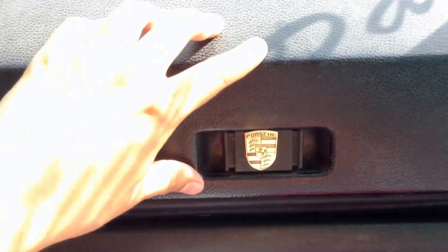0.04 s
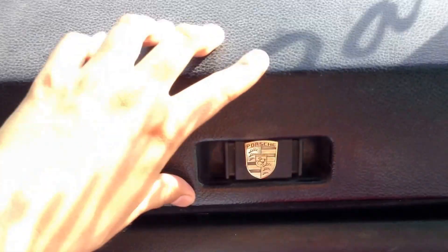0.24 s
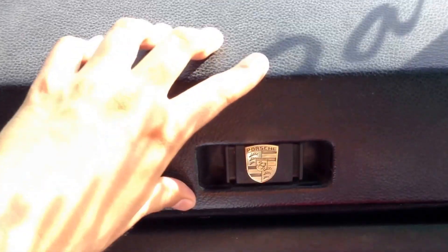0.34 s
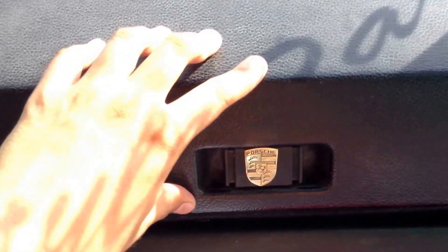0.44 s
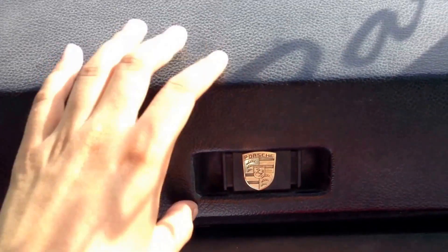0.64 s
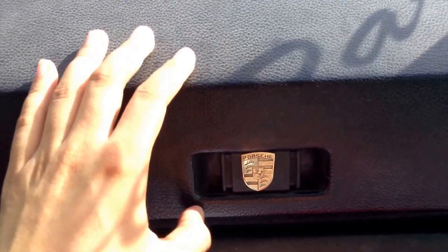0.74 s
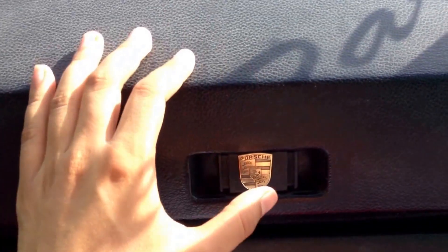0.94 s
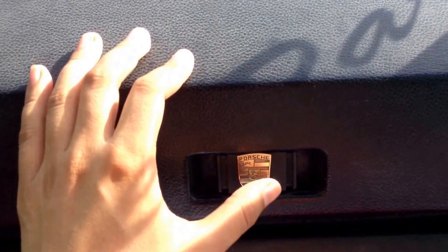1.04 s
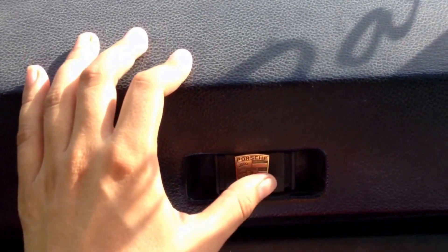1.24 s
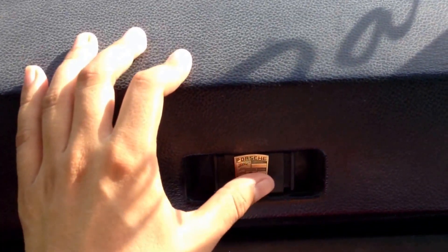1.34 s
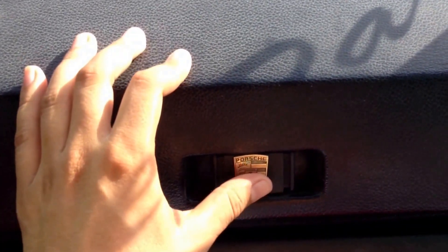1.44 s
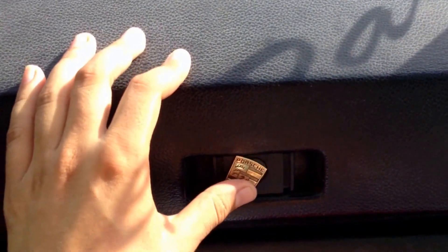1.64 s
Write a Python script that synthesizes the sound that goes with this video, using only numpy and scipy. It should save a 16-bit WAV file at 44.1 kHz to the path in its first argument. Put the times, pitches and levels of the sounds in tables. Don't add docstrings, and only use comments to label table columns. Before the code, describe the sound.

A glove box is pushed shut almost at once, a hollow low thump with a latch click and short plastic rattle, then soft finger bumps and palm rubbing, close microphone in a quiet parked car.

```python
import sys
import numpy as np
from scipy import signal
from scipy.fft import rfft, irfft
from scipy.io import wavfile

SR = 44100
rng = np.random.default_rng(int(sys.argv[2]) if len(sys.argv) > 2 else 0)


def unload_wav(signal):
    wavfile.write(
        sys.argv[1],
        SR,
        np.round(np.clip(np.atleast_2d(signal).T, -1, 1) * 32767).astype(np.int16),
    )


def amplitude_ratio(level_db):
    exponent = np.asarray(level_db, float) / 20
    return 10 ** exponent


N = 74970

# start_s, boom_db, boom_pitch_hz, boom_length_s, rattle_db
CONTACTS = [
    (0.18, -28.5, 280, 0.014, -49),
    (0.197, -24.5, 240, 0.021, -48.5),
    (0.205, -22.5, 297, .010, -50),
    (0.2115, -9.5, 292, .0200, -28),
    (0.2299, -17.5, 234, .013, -44),
    (0.251, -26, 220.7, 0.012, -59.5),
    (.198, -27, 165, .022, -65),
]
# start_s, boom_db, boom_pitch_hz, boom_length_s, rattle_db
BUMPS = [(.000, -52, 285, 0.006, -79), (0.074, -46, 273, 0.012, -71.5), (0.111, -53.5, 235.3, 0.017, -81),
         (0.131, -45, 261, .014, -71), (0.146, -47, 250, 0.013, -67), (0.341, -48.5, 200, 0.013, -64.5),
         (.344, -49.5, 257.3, 0.018, -79), (.398, -58, 247, 0.0092, -59.5), (0.401, -43.5, 240, .014, -85),
         (.427, -47, 264, .011, -64), (.472, -44, 256, 0.013, -66), (0.522, -45.5, 240, 0.0095, -67),
         (.532, -45, 267, 0.012, -67), (.575, -48.5, 248, 0.0095, -80), (.636, -61, 260, 0.014, -67.5),
         (0.656, -52, 287, .010, -67), (.663, -46.5, 267, 0.017, -76), (0.68, -52.5, 248, 0.0094, -77),
         (0.946, -56, 305.4, 0.011, -66.5), (0.953, -52, 290, 0.025, -72)]


def rms_one(x):
    return x / np.sqrt(np.mean(x ** 2) + 1e-20)


def at_hz(points, hz):
    table_hz, values = np.transpose(points)
    return np.interp(np.log(hz), np.log(table_hz), values)


def drift(rate_hz):
    pole = np.exp(-2 * np.pi * rate_hz / SR)
    wander = signal.lfilter([1], [1, -2 * pole, pole * pole], rng.standard_normal(N + SR))
    return rms_one(wander[SR:])


def ring(clicks, hz, t60_s):
    decay = amplitude_ratio(-60 / (t60_s * SR))
    turn = 2 * np.pi * hz / SR
    return signal.lfilter([0, np.sin(turn)], [1, -2 * decay * np.cos(turn), decay * decay], clicks + 1e-18)


def after(t, rise_s, t60_s):
    t = np.maximum(t, 0)
    return (1 - np.exp(-t / rise_s)) * amplitude_ratio(-60 * t / t60_s)


def booms():
    t, out = np.arange(N) / SR, 0
    for start_s, db, hz, length_s, _ in CONTACTS + BUMPS:
        phase = np.interp((t - start_s) / length_s, [0, 0.33, 1], [0, 0.5, 1])
        swell = np.sin(np.pi * phase) ** 0.55
        out = out + amplitude_ratio(db) * swell * np.sin(2 * np.pi * hz * (t - start_s))
    return out


def pressure(rows):
    t, hold_share, out = np.arange(N) / SR, 0.9, 0
    for start_s, _, _, length_s, db in rows:
        progress = (t - start_s) / (hold_share * length_s)
        out = out + amplitude_ratio(db) * np.interp(progress, [0, 0.15, 0.6, 1], [0.0022, 1, 0.6, 0.00011])
    return out


def rattle(rows):
    clicks_per_s, spread_db, rattle_db = 4000, 4, -12.5
    # pitch_hz, level_db, t60_s
    lid_modes = [(426.8, -1, 0.069), (463, -7, 0.1), (547, -10.5, .06), (625.3, -5, 0.11), (680, -9.5, .06),
                 (741, -13, 0.087), (835, -10, 0.15), (933, -4, .07), (1073, -6, 0.05), (1357, -12, 0.088),
                 (1526, -10, 0.1), (1767, -21, .05), (2100, -12.5, 0.027), (2745, -27, 0.042)]
    clicks = pressure(rows) * (rng.random(N) < clicks_per_s / SR)
    out = 0
    for hz, db, t60_s in lid_modes:
        sign = rng.choice([-1, 1], N)
        uneven = amplitude_ratio(db + rattle_db + spread_db * rng.standard_normal(N))
        out = out + ring(clicks * sign * uneven, hz, t60_s)
    return out


def crack(rows):
    crack_db, rise_s = -7, 0.0015
    # pitch_hz, density_db_per_hz
    colour = [(400, -13.5), (1200, -8), (2500, -18), (3300, -24), (4800, -22.5), (6700, -30.5), (9400, -56),
              (13300, -30)]
    # pitch_hz, t60_s
    decay = [(400, 0.16), (2000, 0.12), (6000, 0.041), (14000, 0.021)]
    t, out = np.arange(N) / SR, 0
    edges = 340 * 2 ** np.arange(0, 5.6, 0.5)
    for low, high in zip(edges, edges[1:]):
        hz = np.sqrt(low * high)
        band_pass = signal.butter(2, [low, high], "band", fs=SR, output="sos")
        band = signal.sosfilt(band_pass, rng.standard_normal(N))
        t60_s = at_hz(decay, hz)
        fall = sum(amplitude_ratio(db) * after(t - start_s, rise_s, t60_s) for start_s, *_, db in rows)
        out = out + amplitude_ratio(at_hz(colour, hz) + crack_db + 16) * band * fall
    return out


def latch():
    # start_s, level_db, pitch_hz, t60_s
    ticks = [(.184, -50.5, 2106, 0.042), (.184, -63.5, 3904, .016), (.184, -66, 4720, 0.013),
             (.205, -60, 2950, .03), (.2135, -41.5, 4844, 0.023), (0.22, -50, 4402, .03),
             (.216, -56.5, 6280, .02), (0.952, -68, 1714, .03), (.986, -68, 4160, .025)]
    # start_s, level_db, pitch_hz, t60_s
    knocks = [(.182, -41.5, 610, .05), (.214, -34, 620, .06), (.214, -28, 933, .075),
              (.214, -34, 1073, .07), (.214, -35, 1357, 0.077), (0.212, -43, 1538, .07),
              (.216, -34, 412, .13), (.214, -39, 835, 0.076), (.341, -51, 545, 0.061),
              (.342, -59, 843, 0.057), (.396, -56, 1170, .028), (.403, -64, 1030, 0.025),
              (.523, -56, 608, 0.098), (.524, -62, 1000, 0.057), (.657, -64, 680, .05),
              (.949, -63.5, 1200, 0.039), (.949, -64.5, 1474, 0.03)]
    t, out = np.arange(N) / SR, 0
    for start_s, db, hz, t60_s in ticks + knocks:
        out = out + amplitude_ratio(db) * after(t - start_s, 0.00068, t60_s) * np.sin(2 * np.pi * hz * (t - start_s))
    return out


def dash():
    push_rise_s, finger_db = 0.00098, -5
    # pitch_hz, level_db, t60_s
    dash_modes = [(100, -34, .2), (145.1, -13, .17), (165, -21.5, .15), (189.9, -21.5, 0.09),
                  (215, -9, 0.23), (262, -24, 0.083), (313, -17, 0.069), (340, -27, .13)]
    blows = [(start_s, db) for start_s, db, *_ in CONTACTS[:4]]
    blows += [(start_s, db + finger_db) for start_s, db, *_ in BUMPS]
    start_s, blow_db = np.transpose(blows)
    push = np.zeros(N)
    push[(start_s * SR).astype(int)] = amplitude_ratio(blow_db)
    soft = np.exp(-1 / (push_rise_s * SR))
    push = signal.lfilter([1 - soft], [1, -soft], push + 1e-18)
    return sum(amplitude_ratio(db) * ring(push, hz, t60_s) for hz, db, t60_s in dash_modes)


def fingers():
    dull = signal.butter(2, 1300, fs=SR, output="sos")
    return amplitude_ratio(1.5) * signal.sosfilt(dull, rattle(BUMPS) + crack(BUMPS))


def hand():
    pitch_hz, width_hz, edge_db = 240, 110.3, -18.5
    # start_s, level_db
    friction = [(0, -64), (0.151, -64.5), (.3, -52.5), (.45, -57.5), (.6, -62.5), (.7, -72.5),
                (0.849, -70.5), (1.7, -82)]
    start_s, db = np.transpose(friction)
    low = ring(rng.standard_normal(N), pitch_hz, 3.2 / width_hz)
    low = rms_one(ring(low, 0.67 * pitch_hz, 2.7 / width_hz))
    edge = amplitude_ratio(edge_db) * rms_one(ring(rng.standard_normal(N), 600, 0.004))
    level_db = np.interp(np.arange(N) / SR, start_s, db) + 3.0 * drift(21)
    return amplitude_ratio(level_db) * (low + edge)


def coloured(spectrum):
    top_cut_hz = 15320
    hz = np.fft.rfftfreq(N, 1 / SR) + 1
    bins = rfft(rng.standard_normal(N)) * amplitude_ratio(at_hz(spectrum, hz)) * (hz < top_cut_hz)
    return rms_one(irfft(bins, N))


def cabin():
    rumble_db, hiss_db = -67, -72
    # pitch_hz, density_db_per_hz
    rumble = [(26, -48.5), (45, -17), (113, -21), (137, -2.5), (246, -8), (286, -4), (403, -16), (700, -20),
              (910, -50), (1540, -120)]
    # pitch_hz, density_db_per_hz
    hiss = [(410, -27), (700, 0), (967, -4.5), (1060, -2.5), (1480, -6.5), (1600, -8), (4790, -9),
            (9740, -17.5), (15300, -9)]
    return amplitude_ratio(rumble_db + 0.707 * drift(10)) * coloured(rumble) + amplitude_ratio(hiss_db) * coloured(hiss)


def scene():
    lid = booms() + rattle(CONTACTS) + crack(CONTACTS) + latch()
    close = lid + dash() + fingers() + hand()
    bass_cut = signal.butter(6, 128, "high", fs=SR, output="sos")
    mix = signal.sosfilt(bass_cut, close) + cabin()
    return mix[None, :]


def top_cut(x):
    return signal.sosfilt(signal.butter(12, 15690, fs=SR, output="sos"), x)


def record(dry):
    return top_cut(dry)


dry = scene()
out = record(dry)
unload_wav(out)
```